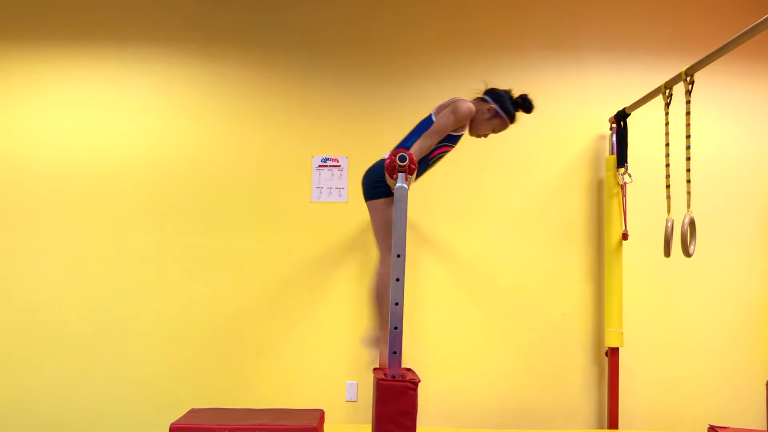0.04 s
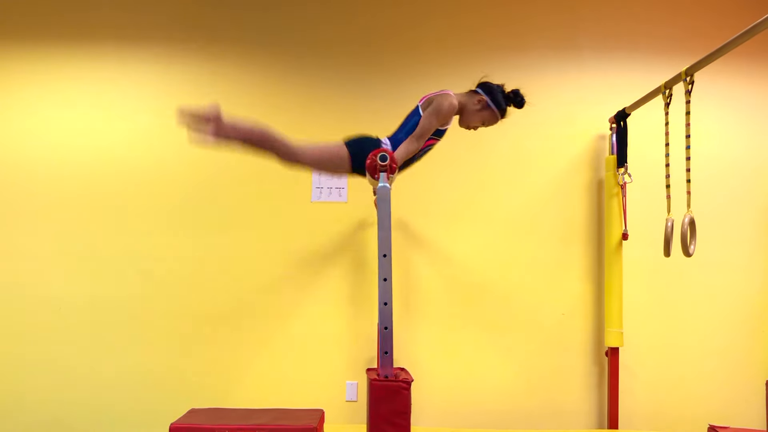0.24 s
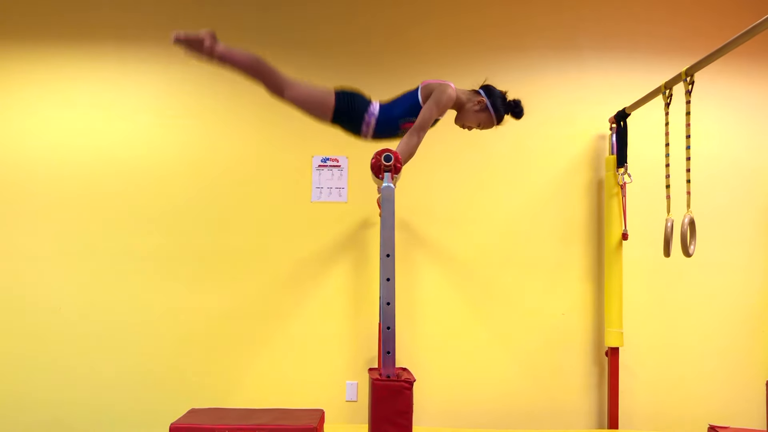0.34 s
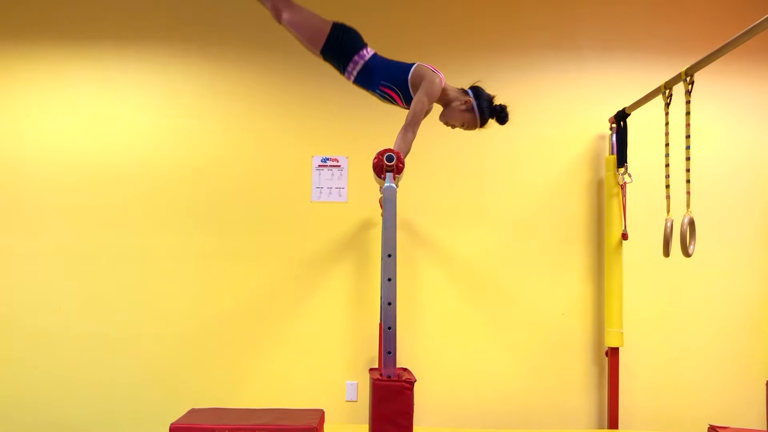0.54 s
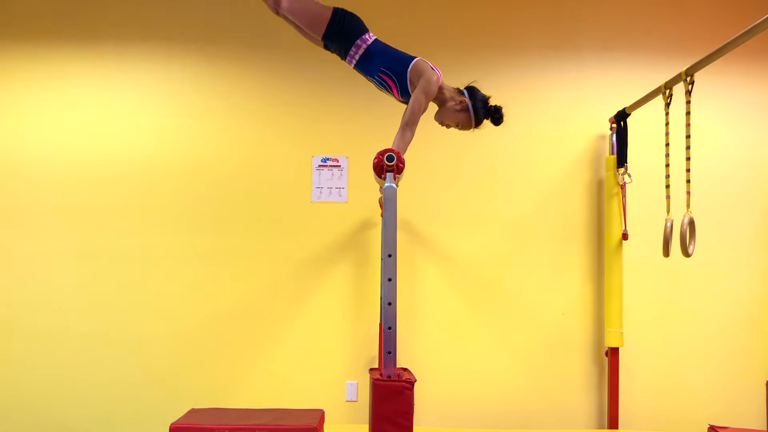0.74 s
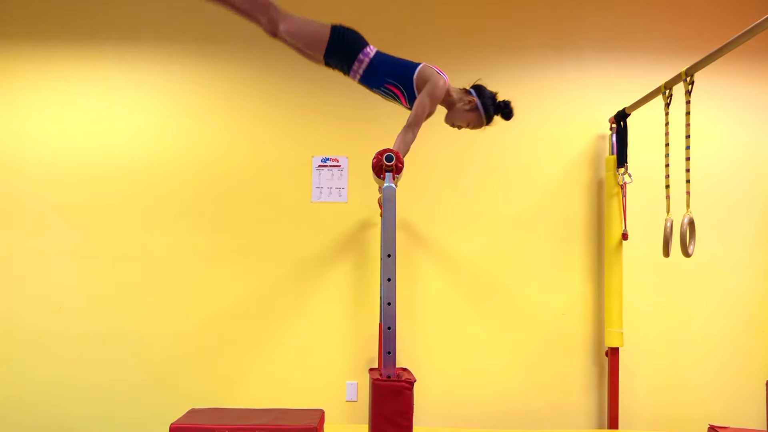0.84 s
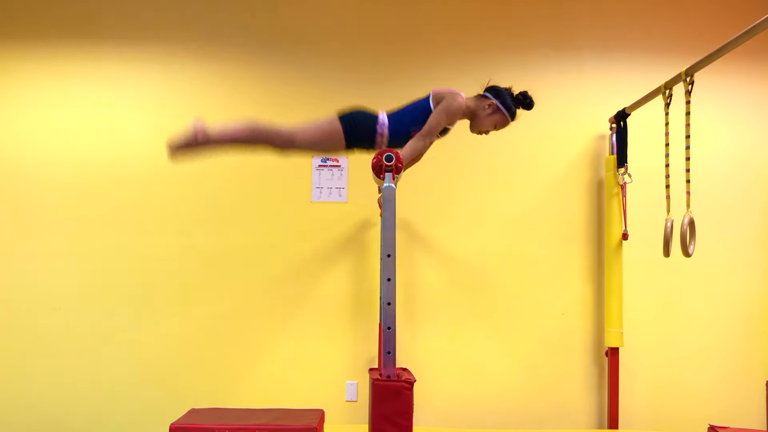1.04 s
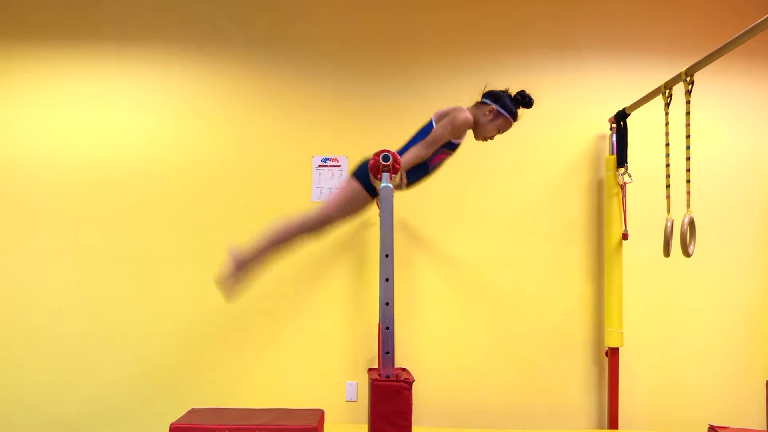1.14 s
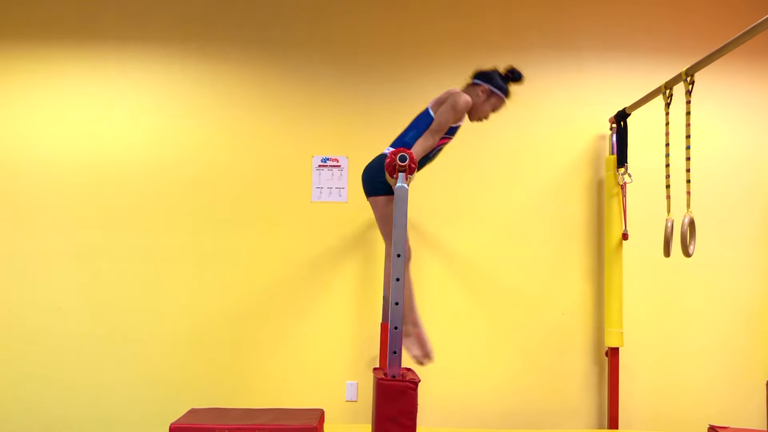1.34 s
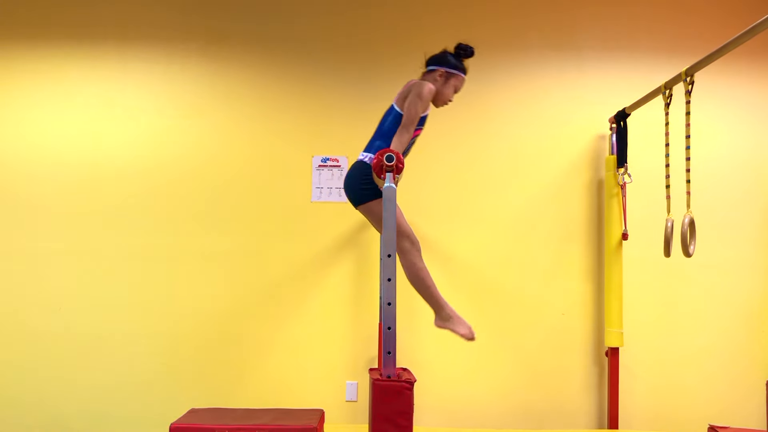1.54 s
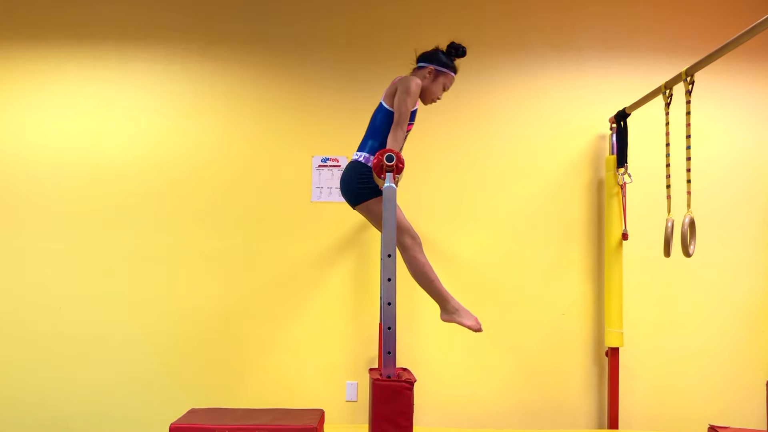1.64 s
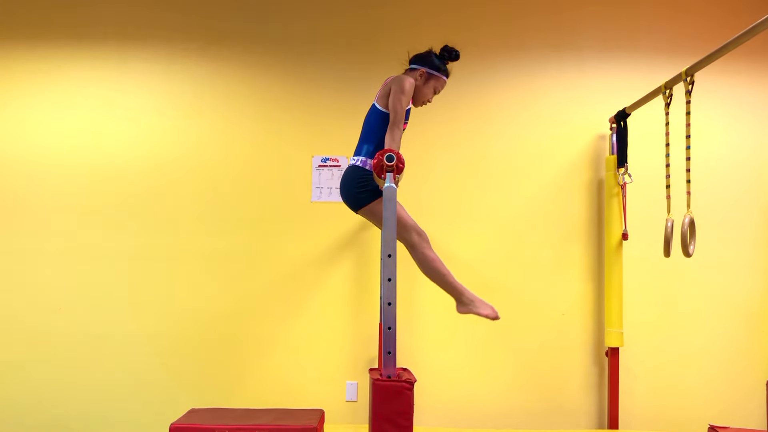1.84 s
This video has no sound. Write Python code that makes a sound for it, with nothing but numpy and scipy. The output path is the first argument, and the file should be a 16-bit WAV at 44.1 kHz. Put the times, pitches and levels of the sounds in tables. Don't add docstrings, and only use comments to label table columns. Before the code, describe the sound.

A loose steel gymnastics bar rattles and clanks as a gymnast casts off, goes nearly quiet with faint ticks, then grinds, squeals and knocks on the return, in a small echoing gym with low ventilation hum.

```python
import sys
import numpy as np
from scipy import signal
from scipy.fft import rfft, irfft, next_fast_len
from scipy.io import wavfile
from scipy.ndimage import map_coordinates

SR = 44100
rng = np.random.default_rng(int(sys.argv[2]) if len(sys.argv) > 2 else 0)


def nominal_scale(level):
    x = np.asarray(level, float) / 20
    return 10 ** x


def inscribe(sig):
    pcm = np.round(np.clip(np.atleast_2d(sig).T, -1, 1) * 32767)
    wavfile.write(sys.argv[1], SR, pcm.astype(np.int16))


N = 83790

# frequency in Hz, level in dB per Hz.
AIR_COLOUR = [(15, -37.5), (25, -4), (117, -9), (237, -18.5), (365, -20.5), (430, -35), (2120, -43.5),
              (7580, -49), (16200, -61)]
# centre in Hz, width in Hz, level in dB.
HUM_BANDS = [(115.7, 37.2, -61.5), (140, 40, -63)]
# start in seconds, level in dB,
# chatter length in seconds, tilt in dB per octave, pitch of the struck tube in Hz.
SETTLING_TICKS = [(.645, -57.5, .016, -5.5, 2800), (.573, -60, .018, -9, 1600), (.653, -62, .03, -7, 2000),
                  (1.097, -70, .003, -4, 5600), (.735, -75, .02, 1, 10400), (.765, -59, .002, -2.5, 3200),
                  (.770, -62, .002, -2.5, 1500), (.866, -52, .018, .3, 7450), (.868, -62, .012, -2, 3600),
                  (1.14, -74, .02, 0, 5600), (0, -66, .035, -1, 3800), (1.897, -62, .003, 0, 3800)]
# start in seconds, level in dB,
# chatter length in seconds, tilt in dB per octave, pitch of the struck tube in Hz.
JOINT_CLANKS = [(.038, -48, 0.0245, -3.5, 7400), (.063, -52.5, 0.0232, 1.5, 7070),
                (.108, -50.5, 0.02205, -1.5, 6130), (.194, -56, 0.0309, -4.5, 7650),
                (.238, -36, 0.017, -2.5, 3564), (.243, -30.5, 0.015, -2, 3756),
                (.272, -41.5, 0.01, -6, 2590), (.25, -40, 0.0214, 5.5, 5794), (.343, -46.5, 0.028, 1, 6990),
                (.383, -47.5, 0.0226, 1.5, 7340), (.437, -50.5, 0.0245, 0, 9230),
                (1.527, -34.5, 0.00715, -2, 3835), (1.542, -44, 0.0066, -1, 4000),
                (1.566, -43.5, 0.0122, -3, 2734), (1.575, -45, 0.0157, -1, 5790),
                (1.593, -45, 0.0175, -5.5, 1633), (1.606, -51, 0.0096, 1, 2560),
                (1.643, -69, 0.013, -2, 2700), (.295, -54, 0.0054, -5, 3800),
                (.254, -36.5, 0.024, -1, 1758)]
# start in seconds, level in dB,
# chatter length in seconds, tilt in dB per octave, pitch of the struck tube in Hz.
JOINT_GRINDS = [
    (1.178, -52, 0.0096, -2.5, 2980),
    (1.188, -48, 0.0206, -2.5, 6600),
    (1.206, -35.5, 0.0418, 3, 7990),
    (1.248, -39, 0.021, -3, 1283),
    (1.328, -37.5, 0.046, 1, 8250),
]
# frequency in Hz, level in dB per Hz.
CHATTER_COLOUR = [(150, -26), (300, -6), (700, -8.5), (1800, -15), (3800, -13.5), (8000, -15.5),
                  (10500, -21.5), (16000, -27.5)]
# pitch in Hz, level in dB, time to fade by 60 dB in seconds.
TUBE_TONES = [(2565, 0, .6), (2690, 2, .15), (2950, -10, .3), (3714, -7, .5), (3790, -6, .5),
              (3883, 0, .15), (5670, 0, .2), (6535, -5, .15), (7430, -1, .6), (7560, -8, .45),
              (10400, -11, .25)]
# start in seconds, level in dB, pitch in Hz,
# time to fade by 60 dB in seconds.
BASE_THUMPS = [(.041, -42, 343, 0.0894), (0.077, -42, 138.2, 0.153), (.215, -34, 251.9, 0.0986),
               (.215, -43.5, 648, 0.038), (0.228, -39, 415, 0.0242), (0.243, -35.5, 368.6, 0.0293),
               (.246, -33, 240, 0.08), (.25, -31, 739.3, 0.0797), (.266, -35.5, 388, 0.073),
               (0.261, -31, 110.8, 0.081), (0.495, -51, 322.2, 0.132), (.514, -51.5, 737, 0.07),
               (.524, -52.5, 668, 0.076), (0.577, -56.5, 300, 0.122), (.594, -63.5, 708, 0.058),
               (.654, -54, 362.5, 0.08), (1.153, -56.5, 510, 0.08), (1.161, -50, 601, 0.0533),
               (1.22, -33, 141.4, 0.134), (1.228, -39, 588.3, 0.083), (1.234, -40, 160, 0.114),
               (1.254, -34, 357.9, 0.0854), (1.343, -39.5, 383.8, 0.1436), (1.349, -50, 588, 0.054),
               (1.486, -32.5, 244.8, 0.0607), (1.501, -41.5, 445.7, 0.097), (1.475, -55.5, 605, 0.058),
               (1.487, -43, 702.5, 0.099), (1.508, -41, 418.9, 0.0816), (1.385, -49, 759.5, 0.06),
               (1.529, -38.5, 1297, 0.053), (1.556, -44, 140, 0.151), (1.514, -52.5, 382.5, 0.073),
               (1.531, -36, 352.8, 0.112), (1.535, -37.5, 679, 0.0334), (1.56, -49.5, 491.7, 0.226),
               (1.597, -34.5, 870, 0.0287), (1.624, -41.5, 140, 0.109), (1.64, -50, 562.7, 0.092)]
# start
# in seconds, length in seconds, pitch in Hz, level in dB, loss per overtone in dB.
JOINT_SQUEALS = [(1.204, .008, 7915, -28.5, 25), (1.207, .008, 6666, -36, 14), (1.207, .007, 6180, -39, 14),
                 (1.21, .007, 5150, -35.5, 10), (1.215, .008, 4700, -34, 8), (1.224, .009, 4950, -33.5, 10),
                 (1.232, .012, 4660, -36, 6), (1.222, .03, 2950, -39.5, 5), (1.225, .008, 9400, -37, 30),
                 (1.218, .018, 6620, -42, 15), (1.216, .02, 14100, -50, 15), (1.322, .013, 6250, -37, 18),
                 (1.328, .022, 8750, -39, 20), (1.33, .012, 11550, -48, 20), (1.334, .012, 2700, -45, 20),
                 (1.335, .01, 5730, -39, 12), (1.342, .012, 1955, -42.5, 3), (1.346, .028, 5920, -42, 14),
                 (1.35, .026, 3885, -41, 6), (1.333, .026, 10450, -41, 20), (1.34, .03, 7500, -40, 20),
                 (1.34, .02, 13800, -51, 20), (1.383, .01, 3900, -47, 10), (1.232, .008, 8950, -36, 30),
                 (1.216, .03, 7900, -45, 30), (1.244, .025, 8800, -43, 30), (1.208, .008, 12700, -48, 20),
                 (.237, .006, 3780, -34, 20), (.246, .012, 3790, -31, 20), (.243, .009, 2690, -36, 20),
                 (.252, .008, 5670, -35, 20), (.262, .014, 3790, -42, 20), (1.527, .01, 3720, -39, 20),
                 (1.566, .01, 2690, -45, 20), (.571, .006, 1950, -55, 30), (.571, .006, 1450, -58, 30)]
# frequency in Hz, time to fade by 60 dB in seconds.
ROOM_FADE = [(100, 1), (400, 0.392), (2000, 0.5447), (6000, 0.556), (9000, 0.463), (14000, 0.437)]


def unit(x):
    return x / np.sqrt(np.mean(x ** 2) + 1e-20)


def along(points, hz):
    f, v = np.transpose(points)
    return np.interp(np.log(hz + 1), np.log(f + 1), v)


def wobble(rate, size):
    knots = rng.standard_normal(int(size * rate / SR) + 8)
    return map_coordinates(knots, [2 + np.arange(size) * rate / SR])


def filtered(x, response):
    m = next_fast_len(len(x) + 8192)
    return irfft(rfft(x, m) * response(np.fft.rfftfreq(m, 1 / SR)), m)[:len(x)]


def add(track, s, x):
    part = track[round(s * SR):][:len(x)]
    part += x[:len(part)]


def hum_band(centre_hz, width_hz):
    noise = rng.standard_normal(N)
    return unit(filtered(noise, lambda hz: 1 / (1 + (2 * (hz - centre_hz) / width_hz) ** 2)))


def ventilation():
    air = unit(filtered(rng.standard_normal(N), lambda hz: nominal_scale(along(AIR_COLOUR, hz))))
    air_db = -59.5 + 2.2 * wobble(5.33, N)
    fan_hz = 58.37 + 2.65 * wobble(7.05, N)
    fan = np.sin(2 * np.pi * np.cumsum(fan_hz) / SR)
    fan_db = -51.5 + 2.5 * wobble(8.77, N)
    hum = sum(nominal_scale(db) * hum_band(centre, width) for centre, width, db in HUM_BANDS)
    return nominal_scale(air_db) * air + nominal_scale(fan_db) * fan + hum


def knock(length, tilt_db, struck_hz, ring_db, rise_s):
    struck_octaves, ring_waver_rad = 0.5, 0.65
    chatter_t60_s = min(0.0714, 8 * length)
    t = np.arange(SR * 3 // 5) / SR
    swarm = rng.standard_normal(len(t)) * nominal_scale(1.8 * wobble(406.3, len(t)))
    tube_levels_db = rng.normal(0, 1.5, len(TUBE_TONES))
    patches = rng.standard_normal(80)

    def near(hz):
        return np.exp(-(np.log2((hz + 1) / struck_hz) / struck_octaves) ** 2)

    def colour(hz):
        db = along(CHATTER_COLOUR, hz) + tilt_db * np.log2(np.maximum(hz, 900) / 3000)
        db = db + 2.37 * near(hz)
        db = db + 3 * np.interp(hz / 300, np.arange(80), patches)
        db = db + 7 * np.exp(-((hz - struck_hz) / 150) ** 2)
        return (hz > 150) * hz / (hz + 300) * nominal_scale(db)

    shape = np.minimum(t / rise_s, 1) * nominal_scale(-60 * np.maximum(t - length, 0) / chatter_t60_s)
    rasp = unit(filtered(swarm, colour)) * shape
    tubes = np.zeros(len(t))
    for (hz, tone_db, t60), extra_db in zip(TUBE_TONES, tube_levels_db):
        level_db = tone_db + extra_db - 60 * t / t60 + 5.5 * wobble(60, len(t))
        phase = 2 * np.pi * hz * t + 9 * extra_db + ring_waver_rad * wobble(44.4, len(t))
        tubes += near(hz) * nominal_scale(level_db) * np.sin(phase)
    ring = tubes * (1 - np.exp(-4 * t / length))
    return rasp + nominal_scale(ring_db) * ring


def knock_series(rows, ring_db, rise_s):
    out = np.zeros(N)
    for s, db, length, tilt_db, struck_hz in rows:
        add(out, s, nominal_scale(db) * knock(length, tilt_db, struck_hz, ring_db, rise_s))
    return out


def ticks():
    return knock_series(SETTLING_TICKS, ring_db=-17, rise_s=0.0005)


def clanks():
    return knock_series(JOINT_CLANKS, ring_db=-14.5, rise_s=0.0005)


def thumps():
    spread, attack_s = 0.3538, 0.00043
    out, t = np.zeros(N), np.arange(SR // 3) / SR
    for s, db, hz, t60 in BASE_THUMPS:
        ratios = np.exp(np.arange(-1, 4) * (spread + rng.normal(0, 0.0421, size=5)))
        modes = np.zeros(len(t))
        for k, ratio in enumerate(ratios):
            level_db = -6 * abs(k - 1) - 60 * t * ratio / t60
            modes += (-1) ** k * nominal_scale(level_db) * np.sin(2 * np.pi * hz * ratio * t)
        add(out, s, nominal_scale(db) * (1 - np.exp(-t / attack_s)) * modes)
    return out


def squeals():
    rise_s, fall_s, overtone_top_hz = 0.003, 0.002, 10000
    out, t = np.zeros(N), np.arange(SR // 10) / SR
    for s, length, hz, db, loss_db in JOINT_SQUEALS:
        wavering_hz = hz + 0.009 * hz * wobble(259.5, len(t))
        phase = 2 * np.pi * np.cumsum(wavering_hz) / SR
        tone = np.zeros(len(t))
        for k in range(4):
            if k == 0 or (k + 1) * hz < overtone_top_hz:
                tone += nominal_scale(-loss_db * k) * np.sin((k + 1) * phase)
        shape = (1 - np.exp(-t / rise_s)) * np.exp(-np.maximum(t - length, 0) / fall_s)
        level_db = db + 0.83 + 3 * wobble(348.3, len(t))
        add(out, s, nominal_scale(level_db) * shape * tone)
    return out


def grinds():
    return knock_series(JOINT_GRINDS, ring_db=-26, rise_s=0.008)


def gym(x):
    delay_s = 0.006
    hz, t, z = signal.stft(rng.standard_normal(SR), SR, nperseg=256)
    fade = nominal_scale(-60 * t / along(ROOM_FADE, hz)[:, None])
    tail = signal.istft(z * fade, SR, nperseg=256)[1]
    late = np.pad(x, (round(delay_s * SR), 0))
    return signal.fftconvolve(late, tail / np.linalg.norm(tail))[:N]


def scene():
    air = ventilation()
    knocks = ticks() + clanks() + thumps() + grinds()
    squeal = squeals()
    room = gym(knocks + nominal_scale(-3.5) * squeal)
    return (knocks + squeal + nominal_scale(-6) * room + air)[None]


def low_pass(x):
    return signal.sosfilt(signal.butter(12, 16340, fs=SR, output="sos"), x)


def record(dry):
    low_cut_hz, top_hz = 43.2, 15900
    x = filtered(dry[0], lambda hz: (hz < top_hz) / (1 + (low_cut_hz / (hz + 1)) ** 6))
    return low_pass(x[None])


dry = scene()
out = record(dry)
inscribe(out)
```